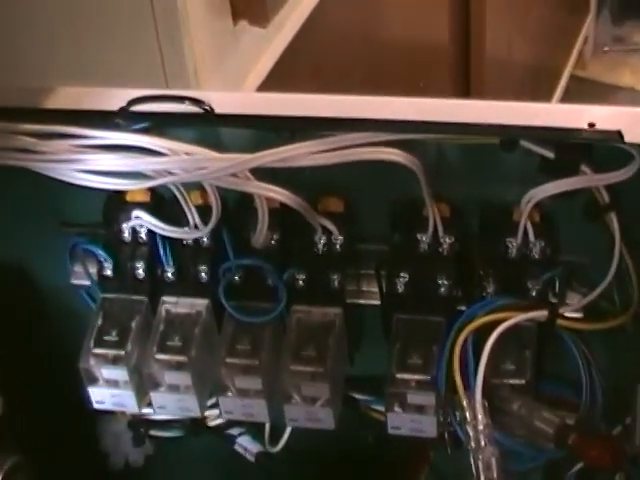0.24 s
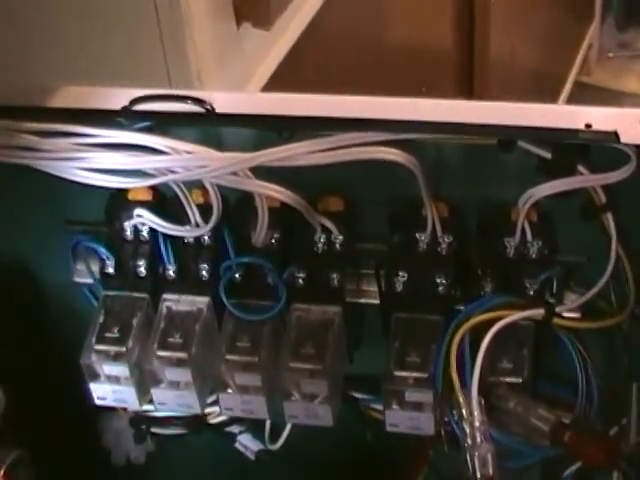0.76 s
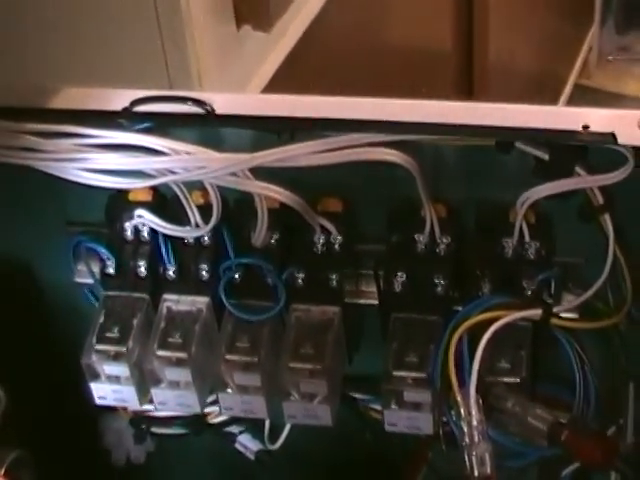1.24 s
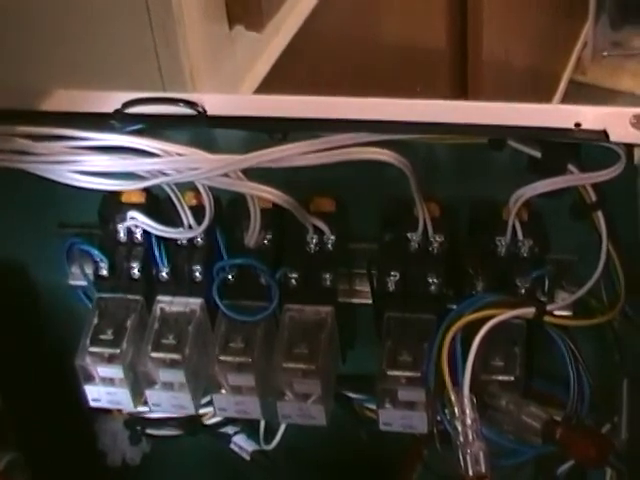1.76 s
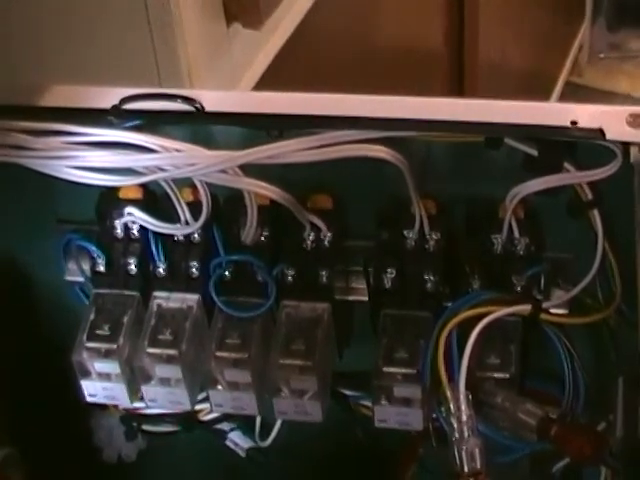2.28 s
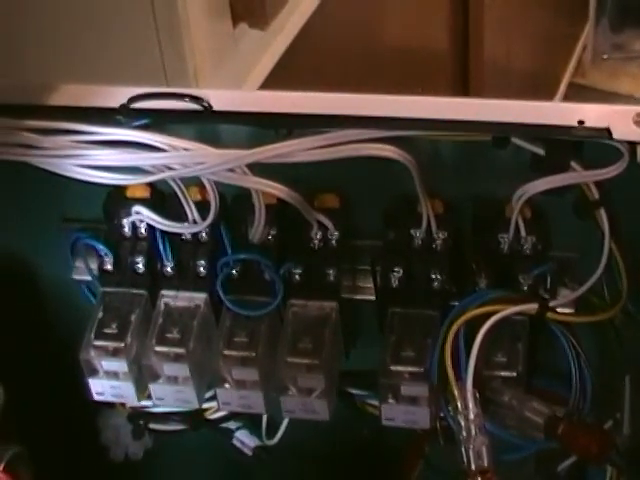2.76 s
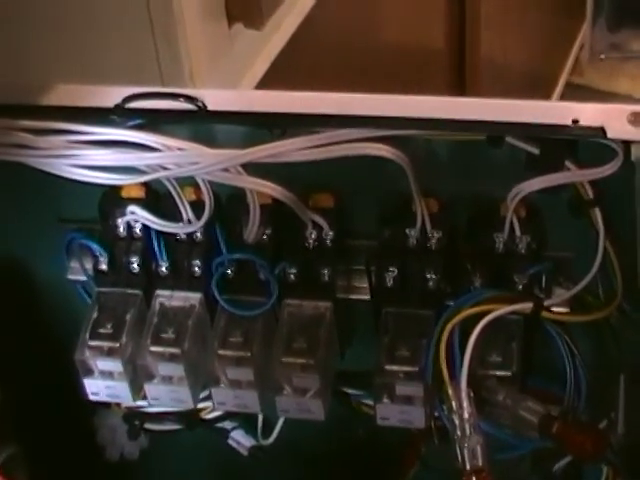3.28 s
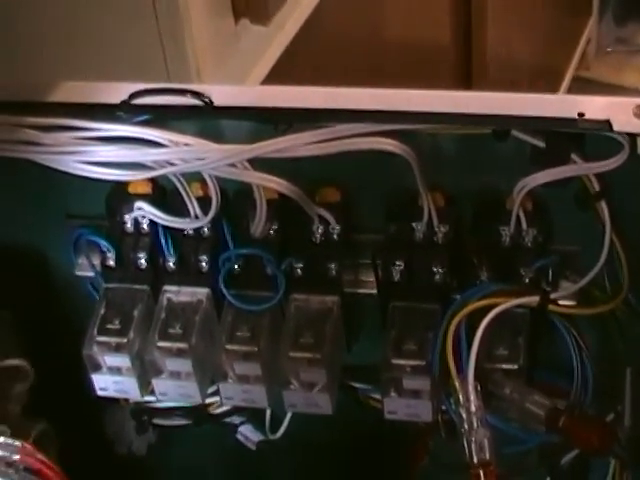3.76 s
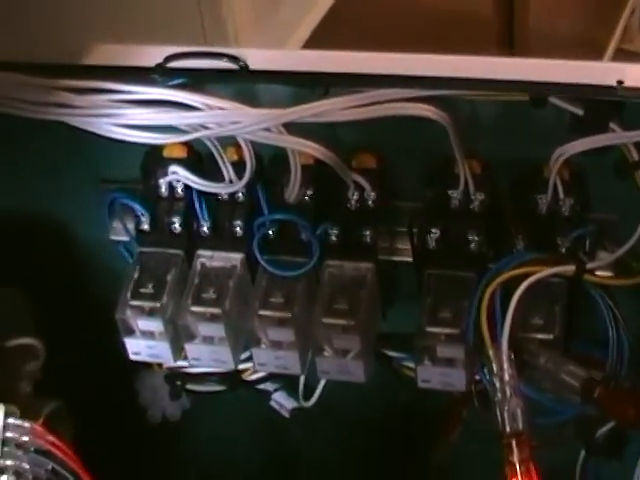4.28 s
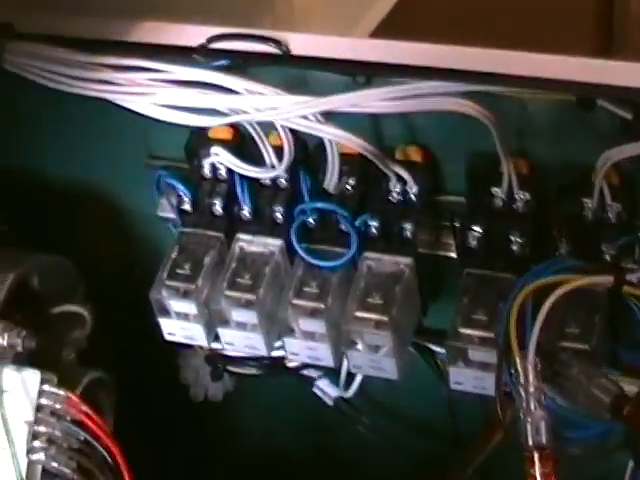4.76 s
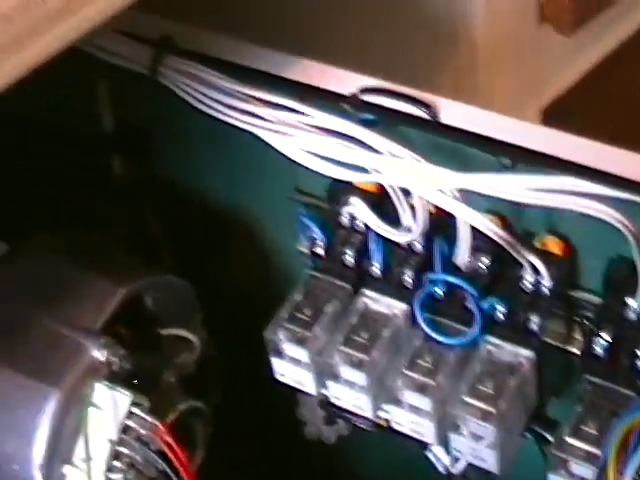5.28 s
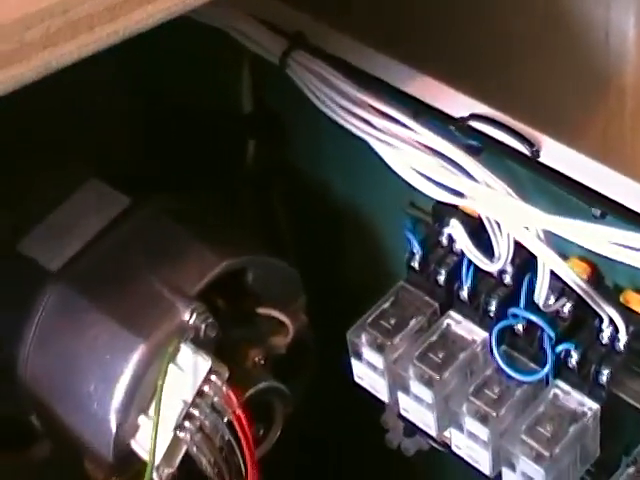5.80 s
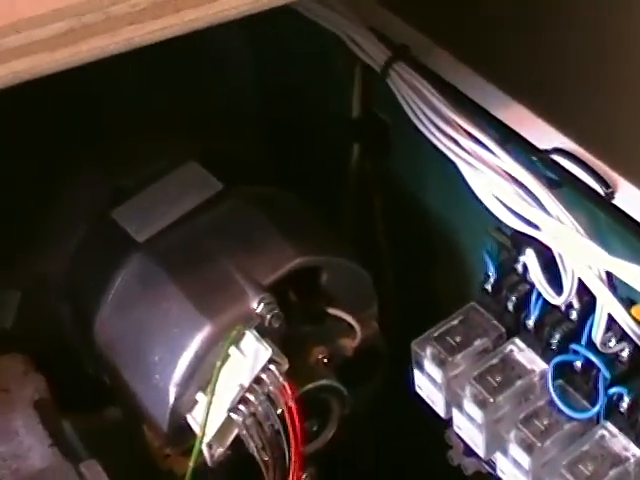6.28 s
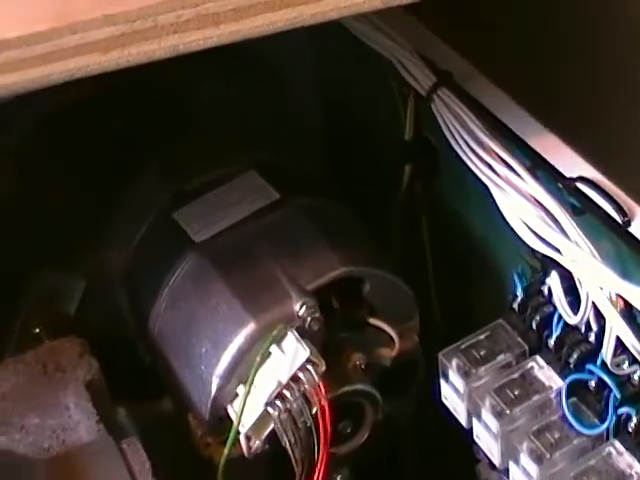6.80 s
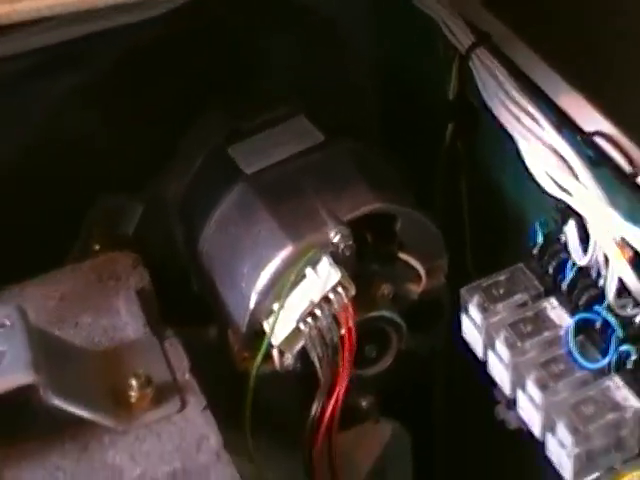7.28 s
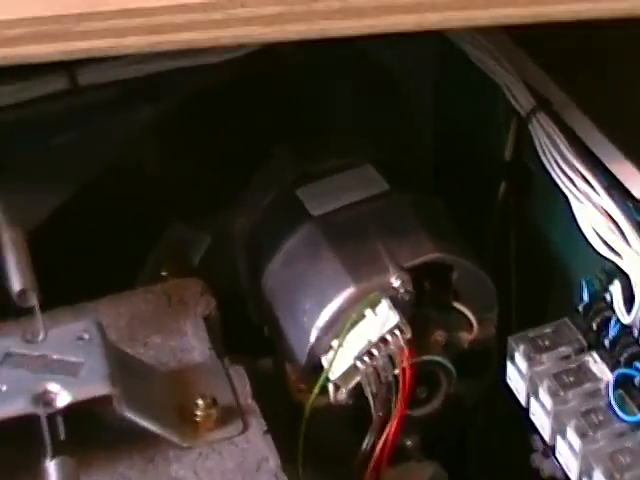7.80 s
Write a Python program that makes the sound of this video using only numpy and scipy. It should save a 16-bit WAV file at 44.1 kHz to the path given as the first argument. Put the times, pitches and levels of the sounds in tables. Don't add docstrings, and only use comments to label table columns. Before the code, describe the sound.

Two sharp relay clicks about three seconds apart in a quiet room, then a washing machine motor jolts on with steady hum and rumble.

```python
import sys
import numpy as np
from scipy import signal
from scipy.io import wavfile
from scipy.ndimage import uniform_filter1d

SR = 44100
rng = np.random.default_rng(int(sys.argv[2]) if len(sys.argv) > 2 else 0)


def log_audio(samples):
    frames = np.atleast_2d(samples).T
    limited = np.clip(frames, -1, 1)
    pcm = np.round(limited * 32767).astype(np.int16)
    wavfile.write(sys.argv[1], SR, pcm)


def field_ratio(decibels):
    return 10 ** (np.asarray(decibels, dtype=float) / 20)


N = 355005


def evened(x):
    return x / np.sqrt(np.mean(x ** 2) + 1e-20)


def read(points, hz):
    f, value = np.transpose(points)
    return np.interp(np.log(hz + 1), np.log(f + 1), value)


def add(mix, s, sound):
    part = mix[..., max(round(s * SR), 0):][..., :sound.shape[-1]]
    part += sound[..., :part.shape[-1]]


def wander(rate):
    return evened(np.interp(np.arange(N) * rate / SR, np.arange(400), rng.standard_normal(400)))


def resonate(x, hz, width):
    turn = np.exp(2j * np.pi * np.cumsum(hz * np.ones(x.shape[-1])) / SR)
    r = np.exp(-np.pi * abs(width) / SR)
    return 2 * (turn * signal.lfilter([1 - r], [1, -r], x / turn)).real


def rung(force, modes, sway_db=0):
    out = 0
    for hz, width, db in modes:
        mode = resonate(resonate(force, hz, width), hz, 3 * width)
        out = out + field_ratio(db + sway_db * wander(5)) * evened(mode)
    return out


def twins(t, hz, db, t60, gap_hz, share):
    turns = hz * t + rng.random() + np.array([[0], [hz / 60000]])
    pair = np.sin(2 * np.pi * turns) + share * np.sin(2 * np.pi * (turns + gap_hz * t))
    return pair * field_ratio(db - 60 * t / t60) * np.minimum(t * hz / 6, 1)


def bumps(rows):
    t = np.arange(N) / SR
    return sum(db * np.exp(-((t - s) / width) ** 2) for s, width, db in rows)


# (frequency [Hz], left over right [dB])
LEAN = [(60, 0.5), (170, 1.4), (500, 0.1), (1450, 1.3), (4190, 0.2), (12100, 2.9)]


def noise(spectrum, same, patchy_db, size=1024):
    hz = np.fft.rfftfreq(size, 1 / SR)
    a, b, c, d, patches = rng.standard_normal((4 * N // size + 5, len(hz), 5)).T
    patches = evened(uniform_filter1d(uniform_filter1d(patches, size=8, axis=0), size=10, axis=1))
    like = np.clip(read(same, hz), -1, 1)[:, None]
    left = a + 1j * b
    right = like * left + np.sqrt(1 - like ** 2) * (c + 1j * d)
    lean = field_ratio(np.array([.5, -.5])[:, None, None] * read(LEAN, hz)[:, None])
    z = np.array([left, right]) * lean * field_ratio(read(spectrum, hz)[:, None] + patchy_db * patches)
    return signal.istft(z, nperseg=size, noverlap=3 * size // 4)[1][:, :N]


# (time [s], level [dB])
MURMUR = [
    (0.0, -40.5),
    (0.24, -42),
    (0.44, -42),
    (0.94, -44.5),
    (2.14, -45),
    (3.01, -44.5),
    (3.35, -43.5),
]
# (frequency [Hz], density [dB per Hz])
AIR = [(15, -23), (25, -14), (102, -10.5), (151, -11.5), (247, -14.5), (296, -19.5), (449, -16),
       (1180, -19.5), (1270, -21), (1380, -22), (1650, -23), (7100, -27), (8080, -25), (11300, -29.5),
       (12600, -39), (16400, -81), (22000, -120)]
AIR_DB = -50.5
# (frequency [Hz], level [dB])
TONES = [(96.9, -50.5), (199.2, -52.5), (247.6, -44.5), (296.1, -58), (393.0, -63), (699.8, -73.5),
         (1281, -62.5), (7800, -66), (7827, -77), (7849, -82)]
# (frequency [Hz], left-right likeness [0-1])
AIR_SAME = [(60, 0.91), (170, 0.98), (500, 0.8), (1450, 0.72), (4190, 0.15), (12100, 0.11)]


def kitchen():
    t = np.arange(N) / SR
    air = noise(AIR, AIR_SAME, 1.0, size=2048)
    low = signal.sosfilt(signal.butter(4, 470, fs=SR, output="sos"), air)
    murmur_db = np.interp(t, *np.transpose(MURMUR)) - 1.0
    out = field_ratio(AIR_DB) * evened(air - low) + field_ratio(murmur_db) * evened(low)
    for hz, db in TONES:
        phase = 2 * np.pi * np.cumsum(hz * (1 + .002 * wander(3))) / SR
        out += field_ratio(db + 1.5 + 1.9 * wander(6.3)) * np.sin(phase)
    return out


# (time [s], level [dB], t60 [s], crack colour [index, rounded])
BLOWS = [(0.007, -41.5, 0.13, 2), (0.1395, -9, 0.03, 0), (0.1425, -13.5, 0.031, 0.5),
         (0.146, -25, 0.14, -0.5), (0.157, -31, 0.022, -3), (0.144, -24, 0.16, 3), (3.0458, -2, 0.0099, 1),
         (3.0483, -5.5, 0.011, 1), (3.0515, -23.5, 0.1, 0.5), (3.06, -29, 0.17, 0.5),
         (3.049, -33.5, 0.21, 3)]
# (frequency [Hz], density [dB per Hz])
CRACKS = [
    [(240, -64), (400, -5), (1100, -15.5), (2540, -20), (2810, -22), (3970, -8.5), (4650, -21), (5070, -14),
     (5860, -18), (6390, -13), (7810, -19), (9430, -14), (12600, -27), (16400, -64.5), (22000, -120)],
    [(240, -60), (400, -34), (1640, -8.5), (2200, -15), (2570, -38), (3380, -13), (3690, -14), (4200, -7),
     (5690, -23), (7060, -10), (7700, -14), (9990, 1), (12600, -20), (16400, -54), (22000, -120)],
    [(2940, -55), (5000, -25), (8320, -9), (9490, 3), (11600, -18), (12600, -33), (16400, -63),
     (22000, -120)],
    [(600, -3), (1500, 0), (2500, -3), (4200, 2.5), (6000, -15), (10000, -14), (12600, -22), (16400, -70.5)],
]
# (frequency [Hz], left-right likeness [0-1])
CRACK_SAME = [(500, 1), (3000, 1), (12000, 0.8)]


def contacts():
    out, t = np.zeros((2, N)), np.arange(SR // 4) / SR
    cracks = [evened(noise(c, CRACK_SAME, 0.57, size=1024)) for c in CRACKS]
    no_bass = signal.butter(4, 1000, "high", fs=SR, output="sos")
    for k, (s, db, t60, colour) in enumerate(BLOWS):
        burst = cracks[round(colour)][:, k * len(t):][:, :len(t)]
        burst = burst * field_ratio(db - 60 * t / t60) * np.minimum(t / 0.00017, 1)
        add(out, s, signal.sosfilt(no_bass, burst))
    return out


# (time [s], level [dB], rebound delay [s], rebound level [dB])
CASE_HITS = [
    (0.1393, -12.5, .0025, -4),
    (3.0455, -11.5, 0.001895, -4),
]
# (frequency [Hz], level [dB], t60 [s])
CASES = [
    [(3460, -6, 0.062), (3980, 2, 0.038), (5080, -1, 0.032), (5566, -21, 0.28), (6223, -1, 0.023),
     (7400, -18, 0.064), (8280, -21, 0.077), (8710, -17, 0.035), (9329, -10, 0.035), (10800, -20, 0.082),
     (11540, -18, 0.033)],
    [(1676, -16, 0.07), (3408, -2, 0.044), (4204, -14, 0.054), (4538, -8, 0.036), (5300, -2, 0.0066),
     (6293, -9, 0.023), (7050, -5, 0.017), (8301, -9, 0.049), (8780, -21, 0.47), (9250, -15, 0.037),
     (9780, -7, 0.036), (10300, -5, 0.029), (11960, -16, 0.046)],
]


def cases():
    out, t = np.zeros((2, N)), np.arange(SR // 8) / SR
    for modes, (s, db, rebound_s, rebound_db) in zip(CASES, CASE_HITS):
        for at, hit_db in ((s, db), (s + rebound_s, db + rebound_db)):
            for hz, mode_db, t60 in modes:
                add(out, at, twins(t, hz, hit_db + mode_db, min(t60, .08), 0, 0))
    return out * field_ratio(np.array([[.8], [-.8]]))


# (time [s], frequency [Hz], level [dB], t60 [s], twin gap [Hz])
COVERS = [
    (0.1445, 3910, -18, 0.11, 74),
    (0.141, 3300, -19, 0.06, 270),
    (0.141, 4970, -21, 0.05, 110),
    (0.1396, 3920, -15, 0.03, 40),
    (0.14, 9300, -12, 0.022, 290),
    (3.047, 4215, -26.5, 0.14, 400),
    (3.046, 14300, -14, 0.012, 1300),
    (3.047, 1500, -34, 0.16, 223),
]


def covers():
    out, t = np.zeros((2, N)), np.arange(SR // 4) / SR
    for s, hz, db, t60, gap_hz in COVERS:
        add(out, s, twins(t, hz, db, t60, gap_hz, 0.8))
    return out


# (frequency [Hz], level [dB], t60 [s])
RINGS = [
    [(1163, 0, 0.62), (2309, -24, 1.2), (3456, -11, 0.57), (3865, -11, 0.23), (4613, -18, 0.71),
     (5055, -18, 0.24), (5523, -9, 0.49), (6535, -17, 0.71), (7477, -21, 0.5), (7827, -26, 0.79),
     (8947, -15, 0.41), (10650, -22, 0.35)],
    [(1174, -5, 1.1), (3467, 1, 0.95), (4587, -28, 1.2), (6508, -26, 1.1), (7450, -15, 0.68),
     (8414, -22, 0.43), (8909, -11, 0.29), (9609, -17, 0.42), (9841, -19, 0.39), (10300, -20, 0.55),
     (10550, -12, 0.26), (10790, -19, 0.41)],
]
# (time [s], level [dB], treble lift [dB per octave], lowest mode's twin gap [Hz] and
# twin share [0-1], other modes' twin gap [Hz] and twin share [0-1], pan [dB])
RING_HITS = [
    (0.14, -33, 1.6, 5.0, .1, 9.0, .15, .6),
    (3.046, -33.5, 2.5, 14.6, .45, 11.2, .4, 1.5),
]


def springs():
    out, t = np.zeros((2, N)), np.arange(SR) / SR
    for modes, (s, db, lift_db, low_gap_hz, low_share, gap_hz, share, pan_db) in zip(RINGS, RING_HITS):
        pan = field_ratio(np.array([[pan_db / 2], [-pan_db / 2]]))
        for k, (hz, mode_db, t60) in enumerate(modes):
            twin = (gap_hz, share) if k else (low_gap_hz, low_share)
            start_db = db + mode_db + lift_db * np.log2(hz / 1000) + 1.5 / t60
            add(out, s, twins(t, hz, start_db, t60, *twin) * np.minimum(t / 0.016, 1) * pan)
    return out


# (time [s], pull of the field [dB])
LOAD = [(3.52, -14.5), (3.67, -13.5), (3.73, -18), (4.14, -18), (4.39, -20.5), (4.44, -27.5), (4.65, -18.5),
        (5.26, -19.5), (5.59, -25.5), (5.66, -19.5), (5.73, -27.5), (5.83, -18.5), (6.11, -24), (6.14, -21),
        (6.57, -24), (6.61, -21), (7.53, -24.5), (8.05, -22.5)]
# (time [s], shaking [dB])
SHAKE = [(3.5, -28), (3.75, -18.5), (4.11, -20.5), (4.4, -14), (4.45, -21.5), (4.78, -18.5), (5.67, -19),
         (5.7, -25), (5.86, -17), (6.0, -20), (6.05, -18), (6.06, -16.5), (6.57, -21.5), (6.96, -20),
         (7.72, -25.5), (7.93, -23), (7.99, -22.5), (8.05, -22)]
USUAL_LOAD_DB, USUAL_SHAKE_DB = -19, -20
SWITCH_S, CLIMB_DB_PER_S = 3.36, 291
LAYERS = {"hum": (3.5, -19, 1.0, 0.07, 0), "octave": (3.5, -45, 0.3, .5, -2),
          "rumble": (3.5, -26, -0.07, 0.42, -0.2), "hiss": (3.5, -33.5, -0.03, 0.33, -.5),
          "thud": (3.5, -21, 0.33, 0.5, 0.04), "low": (3, -27.5, 0.5, 0.3, -0.2),
          "middle": (3.5, -31.5, 0.3, -0.5, -2.2), "high": (3.5, -34, 0.7, -0.95, 0.15)}


def strength(layer, extra_db=0):
    t = np.arange(N) / SR
    full_s, db, load_share, shake_share, drift_db = LAYERS[layer]
    load_db = np.interp(t, *np.transpose(LOAD)) - USUAL_LOAD_DB
    shake_db = np.interp(t, *np.transpose(SHAKE)) - USUAL_SHAKE_DB
    climb_db = CLIMB_DB_PER_S * np.minimum(t - full_s, 0)
    db = db + load_share * load_db + shake_share * shake_db + drift_db * (t - 5.5) + climb_db
    return field_ratio(db + extra_db) * (t > SWITCH_S)


SHAFT_HZ = 8.55


def wobble(per_turn, top_s):
    return np.cos(2 * np.pi * per_turn * SHAFT_HZ * (np.arange(N) / SR - top_s))


MAINS_HZ = 50.03


def current_pulse():
    return np.cos(4 * np.pi * MAINS_HZ * np.arange(N) / SR)


# (mains multiple, level [dB])
HUM = [(4, 0), (6, -19), (8, -22), (10, -22), (12, -26), (16, -28)]
# (time [s], half width [s], change [dB])
LURCHES = [
    (3.78, 0.18, 7.5),
    (4.05, 0.13, 9),
    (5.12, 0.12, 7),
    (5.74, 0.054, -18),
    (6.06, 0.054, 15),
    (6.85, .04, 5),
    (6.97, 0.053, 16),
    (7.9, .05, 6),
]
HUM_GRIP_S, HUM_TOP_S = 3.48, 4.985
HUM_WOBBLE_DB, OCTAVE_SWAY_DB = 1.0, 2.5


def motor_hum():
    t = np.arange(N) / SR
    grip_db = CLIMB_DB_PER_S * np.minimum(t - HUM_GRIP_S, 0)
    hum_gain = strength("hum", grip_db + HUM_WOBBLE_DB * wobble(0.98, HUM_TOP_S))
    octave_gain = strength("octave", bumps(LURCHES) + OCTAVE_SWAY_DB * wander(11))
    hum = np.zeros(N)
    for k, db in HUM:
        turns = k * MAINS_HZ * t + 0.0098 * wander(5.1) + rng.random()
        hum += field_ratio(db + 1.15 * wander(14)) * np.sin(2 * np.pi * turns)
    return field_ratio(4.0) * hum_gain * hum + field_ratio(1.5) * octave_gain * current_pulse()


# (frequency [Hz], density [dB per Hz])
RUMBLE = [(410, -14), (700, 2), (795, -5.5), (890, -3.5), (1050, -4.5), (1170, -5), (1320, -8),
          (1660, -7.5), (1870, -7.5), (2010, -6), (2450, -8), (2760, -9.5), (3230, -15.5), (3640, -18.5),
          (4200, -34), (5460, -34), (9240, -120)]
# (frequency [Hz], left-right likeness [0-1])
SAME = [(60, 0.95), (150, 0.93), (350, 1.0), (850, 0.99), (2070, 0.96), (5010, 0.76), (12100, 0.52)]
# (frequency [Hz], width [Hz], level [dB])
HOUSING = [(1170, 117, -14.5), (1868, 71, -18.5), (2240, 65, -25.5), (2778, 51, -18.5)]
# (time [s], half width [s], change [dB])
JOLT = [
    (3.42, 0.065, 10.8),
    (3.41, 0.027, 2.4),
]


def housing_rumble():
    rumble = evened(noise(RUMBLE, SAME, 1.22))
    rumble = rumble + rung(rumble, HOUSING, sway_db=0.0)
    rumble = evened(rumble * (1 + 0.043 * current_pulse()) * field_ratio(0.98 * wander(40)))
    grit = field_ratio(1.2 * np.minimum(rng.exponential(1, N), 5)) * (rng.random(N) < 150 / SR)
    chatter = signal.oaconvolve(grit, np.exp(-np.arange(400) / 90))[:N]
    return strength("rumble", bumps(JOLT)) * evened(rumble * (1 + 0.09 * chatter))


# (frequency [Hz], density [dB per Hz])
HISS = [(2060, -22), (3500, -4), (3650, -2), (4180, -5), (5580, -2.5), (6040, -1.5), (7020, -1), (7570, -3),
        (8200, -2.5), (11100, -8.5), (12600, -25.5), (16400, -55), (22000, -120)]
# (frequency [Hz], width [Hz], level [dB])
BRUSHES = [(6190, 44, -20.5), (7070, 300, -21), (8070, 110, -17), (3750, 31, -34), (9715, 100, -26)]
# (time [s], half width [s], change [dB])
SPARKS = [
    (3.425, 0.065, 9.5),
    (3.49, 0.02, 9.5),
    (3.89, 0.057, 5.5),
]


def brush_hiss():
    hiss = evened(noise(HISS, SAME, 1.5))
    hiss = hiss + rung(hiss, BRUSHES, sway_db=-1.5)
    hiss = evened(hiss * (1 + 0.078 * current_pulse()) * field_ratio(0.61 * wander(45)))
    return field_ratio(0.84) * strength("hiss", bumps(SPARKS)) * hiss


PUSH_S = 0.017


def pushes(rows):
    t = np.arange(N) / SR
    return sum(field_ratio(db - 9.0) * np.exp(-((t - s) / PUSH_S) ** 2) for s, db in rows)


# (frequency [Hz], density [dB per Hz])
LOW = [(35, -58), (60, -36), (145, -11), (197, -7), (250, -7), (355, -11.5), (426, -2), (480, -6.5),
       (641, -8), (900, -28), (1170, -55), (1980, -120)]
# (frequency [Hz], width [Hz], level [dB])
SMALL_PANELS = [(155, 25, -12), (297.4, 28, -9), (667, 42, -15), (787, 30, -11.5)]
# (frequency at first [Hz], frequency nearer the motor [Hz], width [Hz])
PANELS = [
    (428, 421, 12),
    (538, 543, 10),
    (660, 642, 6),
]
# (time [s], half width [s], change [dB])
SLACKS = [(3.58, 0.076, -16), (3.91, 0.022, -8), (4.12, 0.048, -7), (4.5, 0.059, -3.5), (4.63, 0.036, -17),
          (4.8, 0.088, 1), (5.19, 0.022, -10), (5.28, 0.014, -5), (5.58, 0.021, -10), (5.72, 0.038, -11),
          (6.54, 0.067, 1), (7.49, .04, -8.5)]
# (time [s], half width [s], change [dB])
BUZZES = [
    (3.44, 0.064, 6),
    (4.38, .06, 6.5),
    (4.57, 0.036, 9.7),
    (4.72, 0.032, 5.6),
    (6.35, 0.08, 4.1),
    (6.65, 0.015, 5.8),
    (7.0, 0.14, 3.8),
    (7.46, 0.044, 12),
    (7.93, 0.052, 9.8),
]
# (time [s], level [dB])
LOW_PUSHES = [(3.696, -18), (3.761, -14.5), (3.858, -16), (3.955, -13.5), (4.004, -23), (4.062, -25),
              (4.256, -21), (4.296, -19), (4.383, -23), (4.424, -15), (4.523, -21), (4.719, -15),
              (4.768, -14), (4.841, -13.5), (4.889, -22), (4.965, -15), (5.006, -20), (5.075, -15),
              (5.126, -17), (5.183, -27), (5.232, -18.5), (5.339, -12), (5.421, -16.5), (5.465, -22),
              (5.528, -22), (5.625, -15.5), (5.843, -13), (5.906, -18), (5.94, -18), (6.015, -21),
              (6.084, -12), (6.185, -13.5), (6.225, -19), (6.273, -17), (6.349, -18), (6.398, -18),
              (6.482, -21), (6.651, -17.5), (6.739, -18), (6.815, -17), (6.873, -19), (6.93, -21),
              (6.994, -18), (7.044, -21), (7.115, -16), (7.168, -25), (7.238, -19), (7.281, -24),
              (7.34, -23), (7.381, -16.5), (7.453, -23), (7.557, -22), (7.594, -23), (7.682, -24),
              (7.745, -24), (7.849, -22), (7.917, -15.5), (8.028, -16)]
# (time [s], level [dB])
MIDDLE_PUSHES = [(3.635, -28), (3.693, -26), (3.76, -24), (3.84, -21), (3.948, -25), (4.0, -24),
                 (4.172, -33), (4.202, -22), (4.236, -27), (4.364, -23), (4.417, -25), (4.532, -24),
                 (4.603, -28), (4.722, -23), (4.763, -19), (4.836, -22), (4.89, -33), (4.929, -23),
                 (4.987, -18), (5.127, -18), (5.232, -15), (5.321, -24), (5.651, -27), (5.884, -27),
                 (6.01, -24), (6.045, -19), (6.144, -20), (6.276, -20), (6.4, -26), (6.475, -22),
                 (6.646, -26), (6.767, -30), (6.866, -24), (6.942, -32), (6.982, -26), (7.159, -26),
                 (7.337, -22), (7.56, -29), (7.657, -22), (7.795, -31)]
PANEL_SWAY_DB, PANEL_THROB_DB, PANEL_TOP_S, PANEL_WAVER_HZ = 2.1, 3.4, 4.772, 2.85


def cabinet():
    t = np.arange(N) / SR
    slack_db = bumps(SLACKS)
    throb_db = PANEL_THROB_DB * wobble(1.8, PANEL_TOP_S)
    own_dbs = {"low": throb_db, "middle": .5 * throb_db, "high": bumps(BUZZES)}
    low, middle, high = [strength(name, slack_db + own_db + PANEL_SWAY_DB * wander(26))
                         for name, own_db in own_dbs.items()]
    wake = np.clip((t - 3.42) / .15, 0, 1)
    low = field_ratio(-9.0) * low * wake + pushes(LOW_PUSHES)
    middle = field_ratio(-5.5) * middle * wake + pushes(MIDDLE_PUSHES)
    force = noise([(20, 9), (2000, -2), (3000, -40)], SAME, 0.94, size=2048)
    thud = evened(noise(LOW, SAME, 0.98, size=2048)) + rung(force, SMALL_PANELS, sway_db=1.0)
    out = field_ratio(-3.0) * strength("thud") * evened(thud)
    near = np.clip((t - 4.8) / 1.23, 0, 1)
    for gain, (far_hz, near_hz, width) in zip((low, middle, high), PANELS):
        hz = far_hz + near * (near_hz - far_hz) + PANEL_WAVER_HZ * wander(9)
        panel = rung(force, [(hz, width, 0)])
        level = np.sqrt(uniform_filter1d((panel ** 2).mean(0), size=900) + 0.033)
        out += field_ratio(3.0) * gain * panel / level
    return out


# (time [s], peak level [dB], pitch [Hz], treble level [dB], t60 [s])
KNOCKS = [(3.425, -47, 1860, 1, 0.023), (3.441, -24.5, 695, -30, 0.036), (3.466, -23.5, 1170, 0.5, 0.047),
          (3.49, -21.5, 1250, 7.5, 0.033), (3.611, -26, 910, 1, 0.05), (3.679, -37, 1140, 13.5, 0.047),
          (3.761, -28, 1180, -10, .04), (3.795, -18, 1270, -11, 0.071), (4.252, -15, 1280, -10, 0.039),
          (4.291, -14.5, 1100, -13, 0.091), (4.384, -18, 1290, -19, 0.06), (4.396, -12, 1170, -21, 0.082),
          (4.54, -16, 1120, -13, 0.048), (4.582, -15, 760, -13, 0.07), (4.841, -23, 1110, -12, .04),
          (5.109, -19, 1210, -4, 0.046), (5.17, -22, 1920, -3, .04), (5.229, -22, 1120, -3.5, 0.064),
          (5.275, -18, 1050, -13, 0.12), (5.704, -23, 1110, -7, .04), (5.869, -18, 1130, -12, .04),
          (5.899, -36, 1080, 15, 0.031), (6.031, -8.5, 1360, -16.5, 0.087), (6.044, -13, 520, -23, 0.039),
          (6.122, -14.5, 1140, -19, .04), (6.143, -25, 1130, -12, .04), (6.269, -15, 600, -14, 0.1),
          (6.619, -27, 1120, 3, 0.042), (6.827, -19, 1190, -16, .04), (6.94, -14, 720, -16, 0.11),
          (7.035, -17, 715, -16, 0.13), (7.216, -25, 923, -16, .04), (7.332, -22, 980, -21, 0.044),
          (7.529, -21, 996, -16, 0.067), (7.599, -18.5, 1320, -11, 0.06), (7.783, -16, 1400, -11, 0.11),
          (7.907, -13.5, 900, -20, 0.048), (7.939, -22, 990, -18, 0.054), (7.366, -32, 3020, 3, .03),
          (3.908, -16, 533, -5, 0.056)]


def drum_knocks():
    out, t = np.zeros((2, N)), np.arange(SR // 5) / SR
    rattle = evened(noise(HISS, SAME, 0.77, size=256))
    shove_colour = [(150, -21), (400, 5.5), (1500, -7.5), (4000, -17), (6000, -34.0)]  # (Hz, dB per Hz)
    shove = evened(noise(shove_colour, SAME, 1.1, size=256))
    for k, (s, db, hz, treble_db, t60) in enumerate(KNOCKS):
        at = slice(k * len(t), (k + 1) * len(t))
        shape = field_ratio(db + 2.5 - 60 * t / t60) * np.minimum(t / 0.0033, 1)
        thud = shove[:, at] + 0.49 * evened(resonate(shove[:, at], hz, 160))
        thud = thud / np.sqrt(np.mean(thud[:, :600] ** 2))
        add(out, s, shape * (thud + field_ratio(treble_db) * rattle[:, at]))
    return out


# (start time [s], end time [s], frequency [Hz], waver [Hz], level [dB])
SQUEAK = [
    (3.832, 3.915, 1922, 18, -22),
    (3.866, 3.925, 5830, 40, -33),
    (3.872, 3.89, 6130, 60, -27),
    (3.895, 3.94, 6130, 20, -26),
    (3.89, 3.925, 6820, 70, -32),
]


def belt_squeak():
    out = np.zeros((2, N))
    for s0, s1, hz, waver_hz, db in SQUEAK:
        span = round((s1 - s0) * SR)
        tone = np.sin(2 * np.pi * np.cumsum(hz + waver_hz * wander(50)[::8][:span]) / SR)
        level = field_ratio(db + 2.0 * wander(39)[::8][:span])
        add(out, s0, level * tone * signal.windows.tukey(span, .6))
    return out


def scene():
    relays = contacts() + cases() + covers() + springs()
    motor = motor_hum() + housing_rumble() + brush_hiss()
    return kitchen() + relays + motor + cabinet() + drum_knocks() + belt_squeak()


def roll_off(x):
    return signal.sosfilt(signal.butter(12, 13100, fs=SR, output="sos"), x)


# (start time [s], end time [s], above [Hz], share lost [0-1])
STARVED = [
    (.11, .131, 1350, .98),
    (3.011, 3.039, 1700, .98),
    (3.436, 3.465, 4200, .6),
    (3.439, 3.45, 4200, .7),
    (3.52, 8.05, 13200, 1),
]
# (from [Hz], to [Hz], time kept at rest [0-1], time kept with motor on [0-1])
FLUTTER = [(11700, 12150, 1, .8), (12150, 12400, 1, .65), (12400, 12750, .08, .5), (12750, 13500, 0, .2)]


def record(dry):
    t, out = np.arange(N) / SR, np.clip(dry, -1, 1)
    for s0, s1, hz, lost in STARVED:
        dull = signal.sosfiltfilt(signal.butter(6, hz, fs=SR, output="sos"), out)
        out = out + (dull - out) * uniform_filter1d(lost * ((t > s0) & (t < s1)), size=100)
    hz, s, z = signal.stft(out, SR, nperseg=1024)
    struck = sum(abs(s - hit[0]) < .03 for hit in CASE_HITS)
    running = s > 3.5
    for lo_hz, hi_hz, kept_rest, kept in FLUTTER:
        chance = np.repeat(rng.random(len(s) // 5 + 1), 5)[:len(s)]
        on = chance < np.where(running, kept, kept_rest + struck)
        z[:, (hz > lo_hz) & (hz <= hi_hz)] *= on * np.where(running, kept ** -.5, 1)
    return roll_off(signal.istft(z, SR, nperseg=1024)[1][:, :N])


dry = scene()
out = record(dry)
log_audio(out)
```